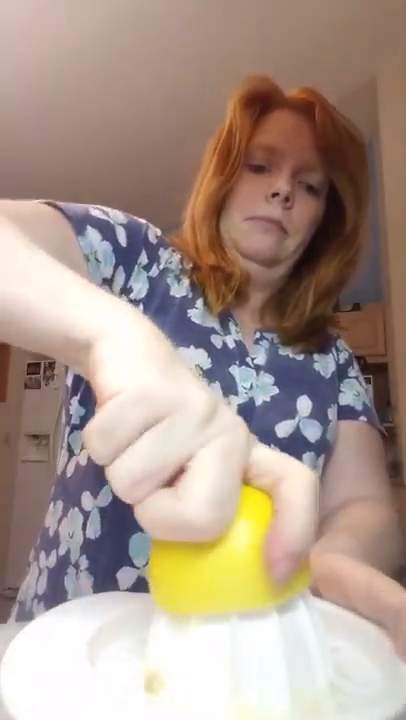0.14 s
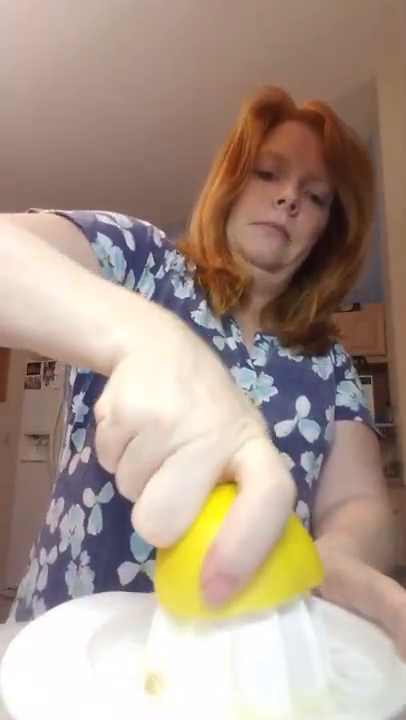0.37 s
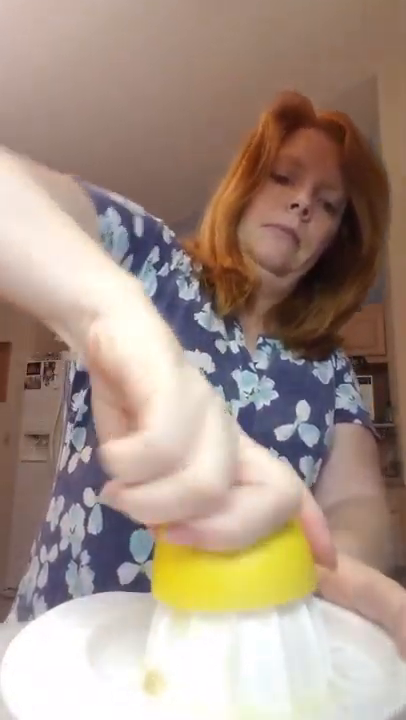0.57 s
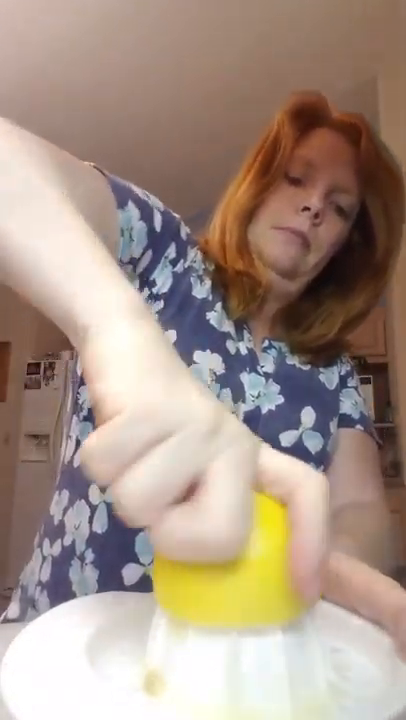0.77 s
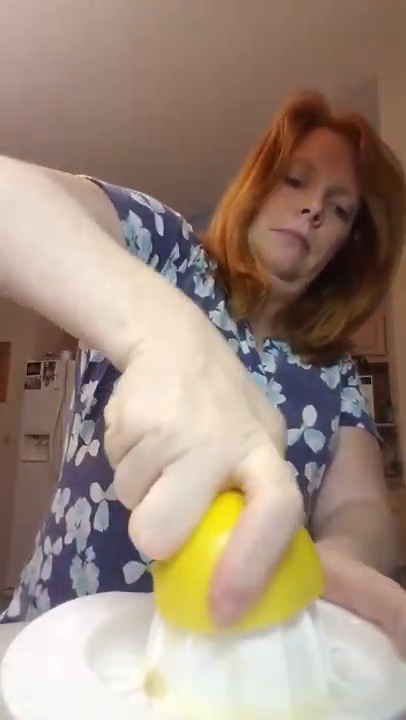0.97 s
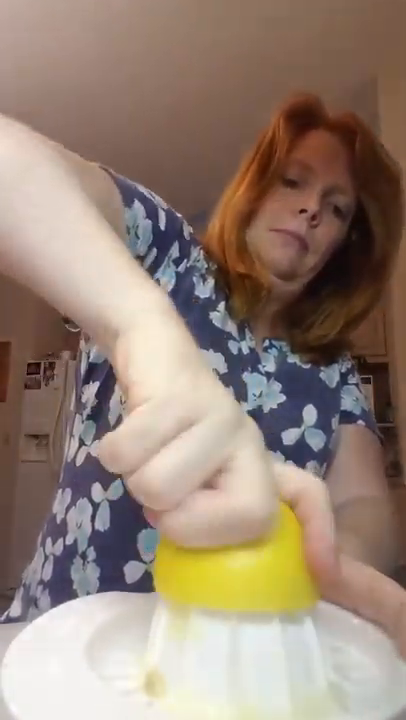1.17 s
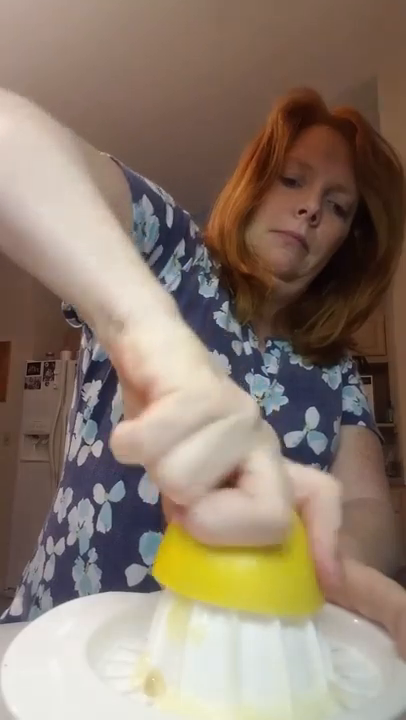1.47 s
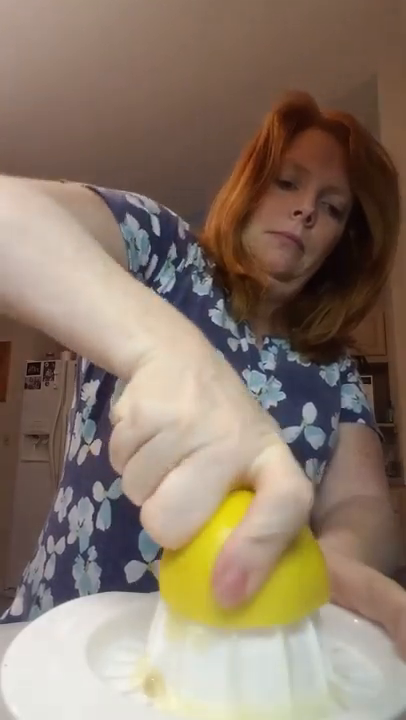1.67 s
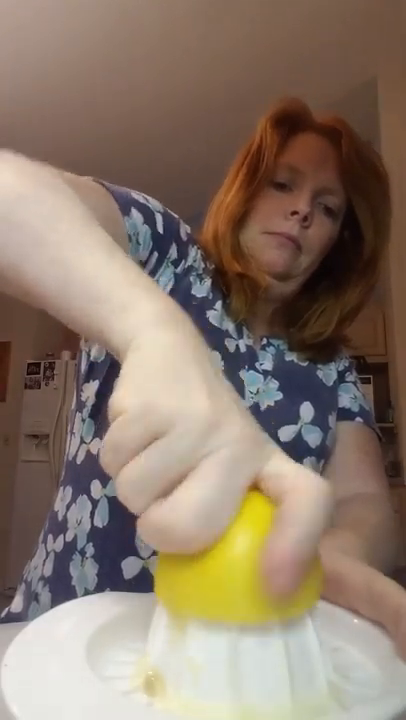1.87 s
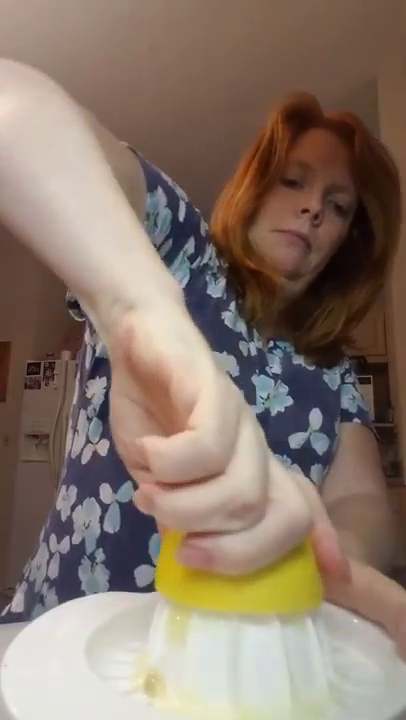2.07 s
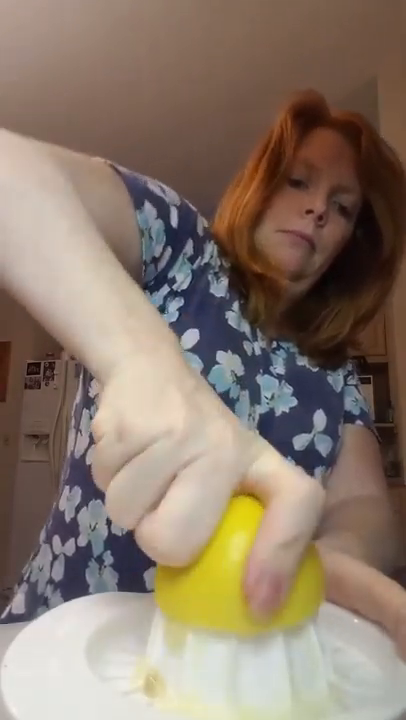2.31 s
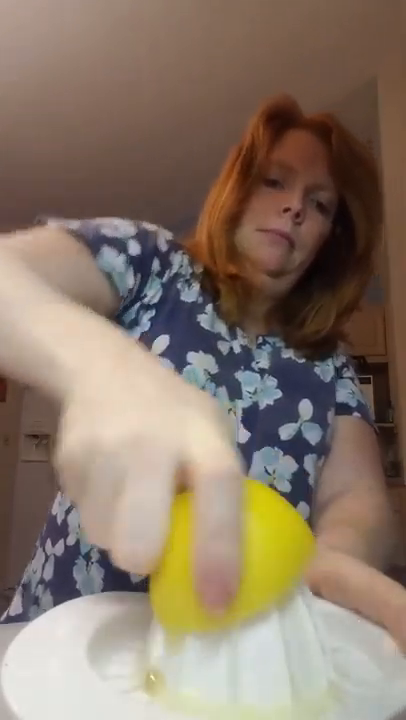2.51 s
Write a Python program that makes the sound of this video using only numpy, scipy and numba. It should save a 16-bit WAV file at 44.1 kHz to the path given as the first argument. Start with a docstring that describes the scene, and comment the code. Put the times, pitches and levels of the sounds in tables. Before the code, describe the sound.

A lemon half is twisted back and forth on a ridged plastic juicer, giving uneven wet squelches, crackling pulp and hollow rubbing bumps, strongest near 1.6 seconds; close phone microphone in a small kitchen with a low hum.

```python
"""In a small kitchen a lemon half is twisted to and fro on the ridged cone of a plastic juicer, close to a phone.
Pulp squelches as decaying noise ticks over a fizz, and juice sacs pop as bursts of resonant noise.
Stick-slip rubbing of the rind and bumps over the ridges are forces that ring the modes of dish and counter.
One thin jet of juice hisses as narrow-band noise; dense echoes and a low hum of room air surround it all."""
import sys
import numpy as np
from scipy import signal
from scipy.fft import rfft, irfft, next_fast_len
from scipy.io import wavfile
from scipy.ndimage import uniform_filter1d
from numba import njit

SR = 44100
rng = np.random.default_rng(int(sys.argv[2]) if len(sys.argv) > 2 else 0)


def magnitude_from_level(level_db):
    """Linear magnitude for a level in decibels (20 dB per decade)."""
    exponent = np.asarray(level_db, float) / 20
    return 10 ** exponent


def master_out(mix):
    """Clip the mix to full scale and print it as 16-bit PCM to the path in sys.argv[1]."""
    frames = np.transpose(np.atleast_2d(mix))
    ceiling = np.clip(frames, -1, 1)
    pcm = np.round(ceiling * 32767).astype(np.int16)
    wavfile.write(sys.argv[1], SR, pcm)


N = 116865
SPAN = 4410  # samples given to one event


def unit(x):
    """Normalisation: scales a signal to an rms of 1."""
    return x / np.sqrt(np.mean(x ** 2))


def colour(x, points):
    """Linear filtering: multiplies the spectrum by (Hz, dB) points joined over log frequency."""
    size = next_fast_len(N + 4096)
    hz, db = np.array(points).T
    f = np.arange(size // 2 + 1) * SR / size + 1
    gain = magnitude_from_level(np.interp(np.log(f), np.log(hz), db))
    return irfft(rfft(x, size) * gain, size)[:N]


def fade(t60, size):
    """Exponential damping: the amplitude falls by 60 dB in t60 seconds."""
    return np.exp(-np.log(1000) * np.arange(size) / SR / t60)


def grains(rate, spread_db):
    """Random point process: impulses of either sign, a few much larger than the rest."""
    chance, sign, size = rng.random((3, N))
    return (chance < rate / SR) * np.sign(sign - .5) * magnitude_from_level(-spread_db * np.log(size + 0.02))


def walk(rate):
    """Slow random modulation: levels drawn rate times a second, joined by slews, with rms 1."""
    k = int(SR / rate)
    steps = np.repeat(rng.standard_normal(N // k + 1), k)
    return unit(uniform_filter1d(steps, k)[:N])


def push(ms):
    """Elastic contact: a half-sine force; a longer contact excites less treble."""
    n = ms * SR / 1000
    phase = (np.arange(int(n) + 2) + .5) / n
    return np.sin(np.pi * np.clip(phase, 0, 1)) / n


def ports(db):
    """Level difference: gains of the left and right ports whose ratio is db."""
    return magnitude_from_level(np.array([[db], [-db]]) / 2)


def partly_alike(noise):
    """Partial coherence: the first row is common to both ports, the other two belong to one each."""
    share = 0.42  # of the power
    return np.sqrt(share) * noise[0] + np.sqrt(1 - share) * noise[1:]


# Spectrum of the room air. Each row: frequency in Hz, relative level in dB per Hz.
AIR_SPECTRUM = [(40, -10), (130, 16), (260, -2.5), (600, -1), (1100, -16.5), (4000, -31.5), (9000, -29),
                (15500, -33), (16500, -52)]


def air():
    """Diffuse-field coherence: steady room tone, alike at both ports in the bass, unlike above."""
    level_db, left_minus_right_db, alike_below_hz = -50, -1.5, 776
    mid = colour(rng.standard_normal(N), AIR_SPECTRUM)
    side = colour(rng.standard_normal(N), AIR_SPECTRUM)
    side = signal.lfilter(*signal.butter(1, alike_below_hz, "high", fs=SR), side)
    pair = np.array([mid + side, mid - side]) * ports(left_minus_right_db)
    return magnitude_from_level(level_db) / mid.std() * pair


# Twisting effort. Each row: time in seconds, squelch level in dB, rubbing force in dB relative to the squelch.
TWIST_EFFORT = [(0, -65, 2), (0.038, -56, 5), (.17, -46.5, 6), (0.347, -46, 14.5), (0.369, -53, -1),
                (.46, -63.5, 6), (0.551, -41.5, 7), (0.6, -32.5, 4), (0.628, -46.5, 8.5), (0.668, -44.5, 1),
                (0.717, -65, 1), (0.822, -40.5, 6.5), (0.841, -36, 4), (0.884, -38, 0.5),
                (0.903, -56.5, 11.5), (1.003, -39.5, 4.5), (1.06, -60, 9), (1.147, -59.5, 0.5),
                (1.197, -43.5, 9), (1.271, -32.5, 6), (1.3, -46.5, 7.5), (1.358, -42, 7.5), (1.451, -69, 3),
                (1.518, -42.5, 4.5), (1.559, -46.5, 3), (1.583, -22, 5), (1.649, -54, 2.5),
                (1.733, -41.5, 7), (1.824, -58, 3.5), (1.923, -58.5, 8.5), (1.976, -31.5, 3.5),
                (2.0, -43.5, 11.5), (2.037, -43.5, 11), (2.089, -57.5, 2), (2.203, -65.5, 8.5),
                (2.261, -37, 1), (2.329, -45, 7.5), (2.352, -35, 0.5), (2.447, -65, -6), (2.556, -46.5, 8),
                (2.65, -58.5, 0)]


def twist():
    """Common drive: one hand sets both the squelch and the rubbing level, in dB, joined by straight lines."""
    s, wet_db, relative_db = np.array(TWIST_EFFORT).T
    t = np.arange(N) / SR
    return np.interp(t, s, wet_db), np.interp(t, s, wet_db + relative_db)


def crackle(effort_db):
    """Superposition of transients: small wet ticks over a fizz, brighter with effort and at random."""
    per_s, spread_db, t60, fizz_db = 240, 3.5, 0.02, -2.5
    tilt_db, brighten = 3.5, 0.13  # random tilt in dB rms; tilt in dB per dB of effort
    ticks = signal.fftconvolve(np.abs(grains(per_s, spread_db)), fade(t60, SPAN))[:N]
    raw = partly_alike(rng.standard_normal((3, N))) * (unit(ticks) + magnitude_from_level(fizz_db))
    low = signal.lfilter(*signal.butter(1, 4500, fs=SR), raw)
    high = raw - low
    tilt = magnitude_from_level(tilt_db * walk(50) + brighten * (effort_db + 25.5))
    return unit(low / tilt + high * tilt) * magnitude_from_level(effort_db)


@njit
def ring(force, turn, decay):
    """Damped oscillator: one mode whose pitch (radians per sample) may move every sample."""
    out, z = np.empty(len(force)), 0j
    for i in range(len(force)):
        z = z * decay * np.exp(1j * turn[i]) + force[i]
        out[i] = z.imag
    return out


# Modes of dish and counter. Each row: frequency in Hz, level in dB, t60 in seconds, left minus right in dB.
DISH_MODES = [(91.8, 4, 0.067, -3), (160.3, -4.5, 0.22, -2), (200.6, 4.5, 0.054, -9),
              (283.3, -2, 0.051, -9), (327.7, -3.5, 0.044, -12), (451, 2.5, 0.015, -16),
              (546.3, 2, 0.05, -6.5), (727.8, 7, 0.044, -8), (768, 1, 0.091, -2.5),
              (1276, -12, 0.04, -26.5)]


def dish(force, bend):
    """Modal superposition: the force rings every mode, which reaches the two ports differently."""
    out = np.zeros((2, N))
    for (hz, db, t60, pan_db), b in zip(DISH_MODES, bend):
        decay = np.exp(-np.log(1000) / (t60 * SR))
        out += ring(force, 2 * np.pi * hz / SR * b, decay) * magnitude_from_level(db) * ports(pan_db)
    return out


def grip():
    """Changing boundary condition: the grip bends each mode's pitch by 1.9 % rms."""
    return [1 + 0.019 * walk(12) for _ in DISH_MODES]


def rubbing(effort_db, bend):
    """Stick-slip friction: a force of many small random slips that clumps and follows the effort."""
    per_s, spread_db, contact_ms, clump_db = 800, 3.5, 0.72, 2.5
    slips = signal.fftconvolve(grains(per_s, spread_db), push(contact_ms))[:N]
    rung_rms = dish(slips, bend).mean(axis=0).std()
    return slips / rung_rms * magnitude_from_level(effort_db + clump_db * walk(60))


# Rind over a ridge. Each row: start in seconds, level in dB (as the peak if the force were one impulse),
# contact in ms, t60 of the judder in seconds.
RIDGE_BUMPS = [(0.0887, -23, 0.17, 0.061), (0.1879, -17, 0.38, 0.035), (.264, -19, 0.97, 0.033),
               (.333, -18.5, .4, .07), (0.4169, -11.5, 0.86, 0.011), (.584, -9, 1.8, 0.056),
               (0.659, -14, 0.61, 0.013), (0.839, -14.5, 0.34, 0.11), (.876, -15, 0.44, 0.05),
               (.967, -24, 0.35, .03), (.9935, -8.5, 0.57, 0.07), (1.206, -13, 0.87, 0.031),
               (1.331, -23.5, 0.37, 0.058), (1.351, -16, 0.42, 0.11), (1.5, -18, 0.3, 0.039),
               (1.573, -1.5, 0.78, 0.031), (1.807, -19.5, 0.12, 0.033), (1.879, -23.5, 0.15, 0.0086),
               (1.951, -14.5, 0.23, 0.069), (2.241, -20, 0.34, 0.02), (2.3425, -8.5, 0.43, 0.065),
               (2.355, -7.5, 1.4, 0.019)]


def bumps(bend):
    """Impact excitation: each bump is a push and a dying random judder of the contact force."""
    judder = 0.81
    force = np.zeros(N)
    impulse_peak = np.abs(dish(np.eye(1, N)[0], bend)).max()
    for s, db, ms, t60 in RIDGE_BUMPS:
        shake = judder * rng.standard_normal(SPAN) * np.sqrt(20 / (t60 * SR)) * fade(t60, SPAN)
        shake[0] -= 1  # the push itself
        i = int(s * SR)
        force[i:i + SPAN] += np.convolve(shake, push(ms))[:SPAN] * magnitude_from_level(db) / impulse_peak
    return force


# Juice sacs bursting. Each row: start in seconds, peak in dB of the resonant part before the ports' colouring,
# pitch in Hz, t60 in seconds.
SAC_POPS = [(0.0902, -33, 2200, 0.048), (.531, -29.5, 11900, 0.012), (0.545, -29, 12000, 0.018),
            (0.5745, -26.5, 6130, 0.027), (0.597, -20.5, 3740, 0.04), (0.6441, -22, 7950, 0.025),
            (0.83, -27, 4960, 0.044), (0.8604, -24.5, 3080, 0.0088), (1.186, -27, 12800, 0.016),
            (1.2202, -20, 14700, 0.03), (1.252, -28.5, 7400, 0.035), (1.3083, -27, 5440, 0.011),
            (1.5013, -36.5, 2220, 0.017), (1.5759, -22.5, 2770, 0.032), (1.673, -34, 13400, 0.014),
            (1.708, -34, 3060, 0.018), (1.8562, -32.5, 5870, 0.0079), (1.932, -37.5, 4000, 0.033),
            (2.0162, -10.5, 6400, 0.027), (2.2498, -27.5, 3540, 0.028), (2.2767, -24, 10300, 0.012),
            (2.3412, -11.5, 10800, 0.029), (2.5503, -28, 2580, 0.0095)]


def pops():
    """Resonant filtering: a short noise burst sounds through a wide resonance, with a broad part beside it."""
    rise_s, q, broad_db = 0.0011, 2.64, -4
    low_share = 0.19  # the broad part starts at this share of the pitch
    out = np.zeros((2, N))
    for s, db, hz, t60 in SAC_POPS:
        rise = np.minimum(np.arange(SPAN) / (rise_s * SR), 1)
        burst = partly_alike(rng.standard_normal((3, SPAN))) * fade(t60, SPAN) * rise
        tone = signal.lfilter(*signal.iirpeak(hz, q, SR), burst)
        broad = signal.lfilter(*signal.butter(2, low_share * hz, "high", fs=SR), burst)
        pop = tone / np.abs(tone).max() + magnitude_from_level(broad_db) * broad / np.abs(broad).max()
        i = int(s * SR)
        out[:, i:i + SPAN] += (magnitude_from_level(db) * pop)[:, :N - i]
    return out


# A thin jet of juice. The one row: start in seconds, level in dB before the ports' colouring, pitch in Hz,
# width in Hz, t60 in seconds.
JUICE_JET = (2.022, -37.5, 5790, 200, 0.08)


def squirt():
    """Narrow-band turbulence: the jet hisses as decaying noise through one sharp resonance."""
    s, db, hz, width, t60 = JUICE_JET
    jet = signal.lfilter(*signal.iirpeak(hz, hz / width, SR), rng.standard_normal(SPAN))
    out = np.zeros(N)
    i = int(s * SR)
    out[i:i + SPAN] = unit(jet) * magnitude_from_level(db) * fade(t60, SPAN)
    return out


# Wet pulp as heard through the phone's ports. Each row: frequency in Hz, gain in dB.
WET_RESPONSE = [(700, -16), (1300, -1), (2800, 4.5), (4000, 0.5), (6000, 2), (7800, 1.5), (8900, -10.5),
                (10200, -2.5), (15500, 2.5), (16400, -43)]


def pulp(effort_db):
    """Superposition: crackle, pops and jet add, then share one frequency response and port balance."""
    wet = crackle(effort_db) + pops() + squirt()
    return np.array([colour(v, WET_RESPONSE) for v in wet]) * ports(-5)


def echoes(x, t60, db):
    """Diffuse reverberation: convolution with decaying noise, unrelated at the two ports."""
    tail = rng.standard_normal((2, SR // 2)) * fade(t60, SR // 2)
    tail = tail / np.sqrt(np.sum(tail ** 2, axis=1, keepdims=True))
    return magnitude_from_level(db) * signal.fftconvolve(x, tail, axes=1)[:, :N]


def scene():
    """Direct and reflected sound: wet sounds come by air with counter echoes; the dish is heard close."""
    room_t60 = 0.35  # seconds
    squelch_db, rub_db = twist()
    wet = pulp(squelch_db)
    bend = grip()
    body = dish(rubbing(rub_db, bend) + bumps(bend), bend)
    counter = echoes(wet, 0.077, -4.5)
    room = echoes(wet, room_t60, -17) + echoes(body, room_t60, -15.5)
    return wet + counter + body + room + air()


def top_cut(x):
    """Nothing passes above the cut-off."""
    return signal.sosfilt(signal.butter(12, 16970, fs=SR, output="sos"), x)


def record(dry):
    """Interaural-style delay and high-pass: the left port hears two samples late; the deepest bass is cut."""
    late = np.array([np.r_[0, 0, dry[0, :-2]], dry[1]])
    low_cut = signal.butter(2, 104.5, "high", fs=SR, output="sos")  # Hz
    mix = signal.sosfilt(low_cut, late)
    return top_cut(mix)


dry = scene()
out = record(dry)
master_out(out)
```